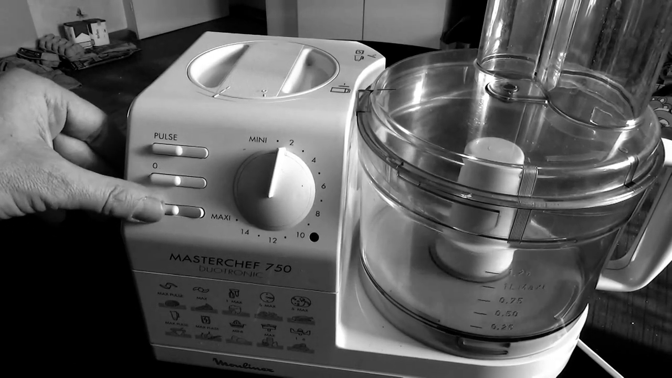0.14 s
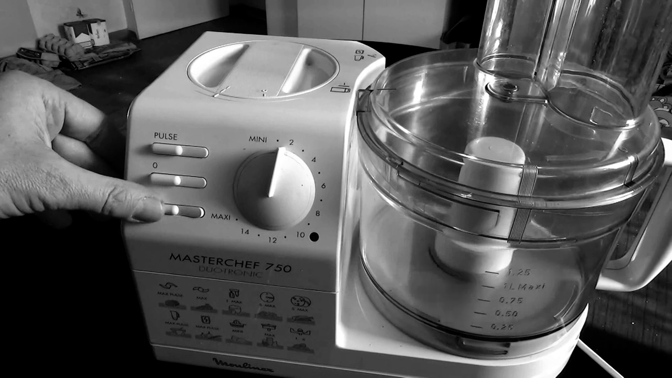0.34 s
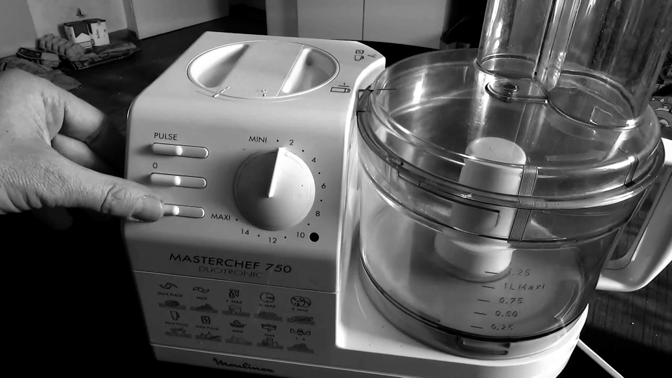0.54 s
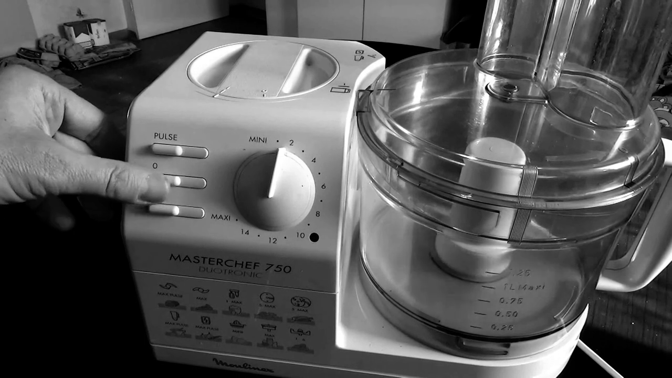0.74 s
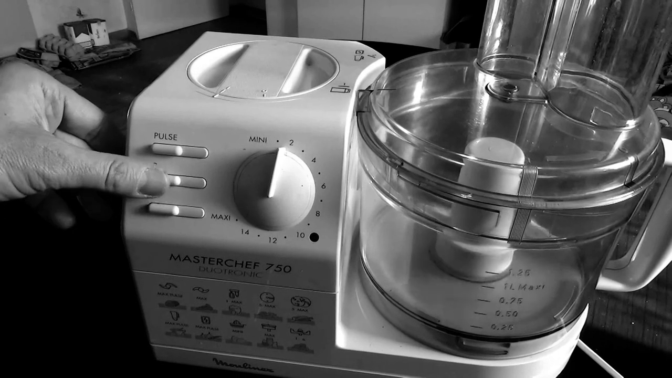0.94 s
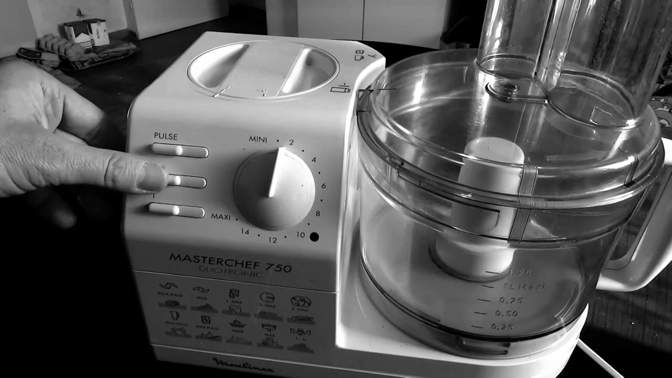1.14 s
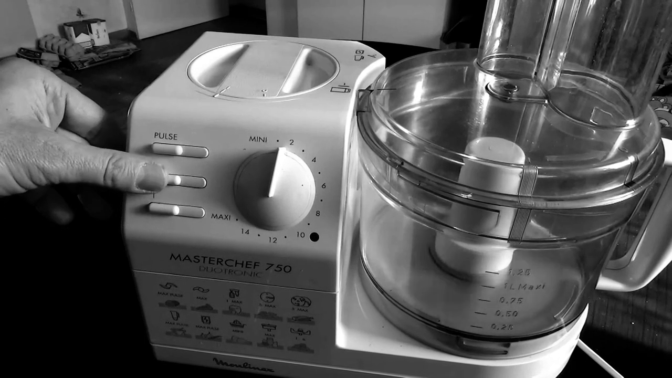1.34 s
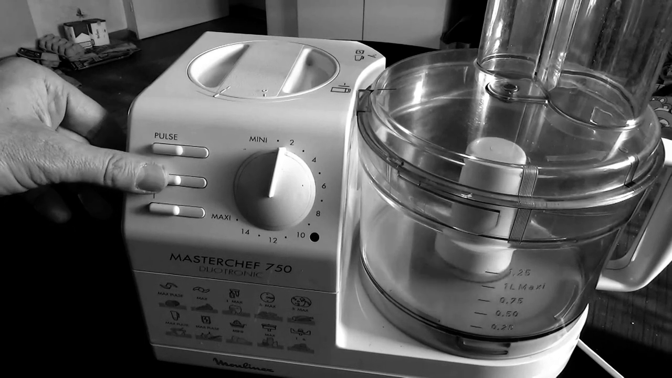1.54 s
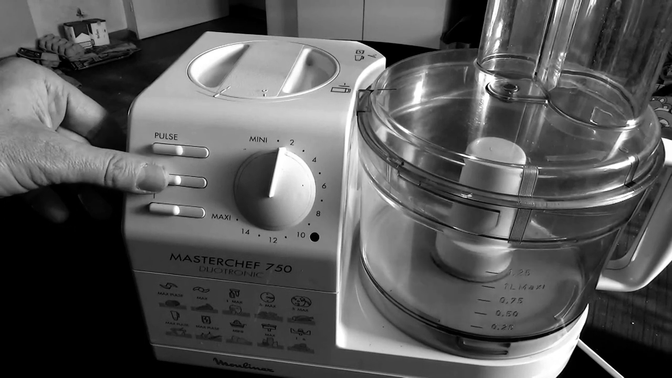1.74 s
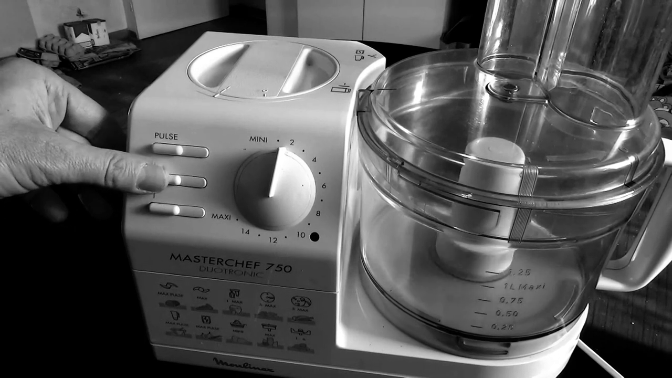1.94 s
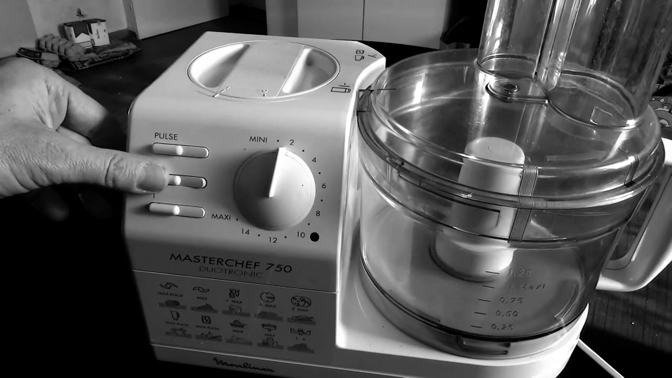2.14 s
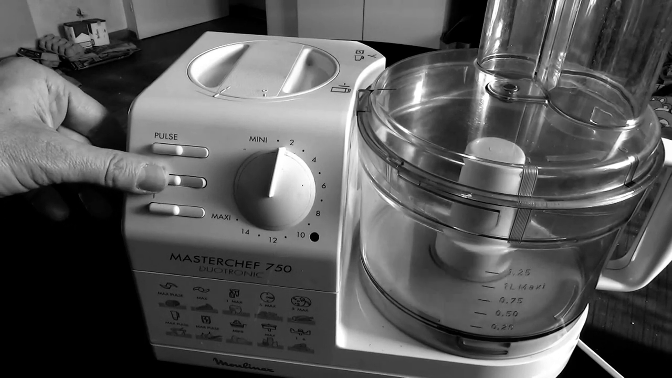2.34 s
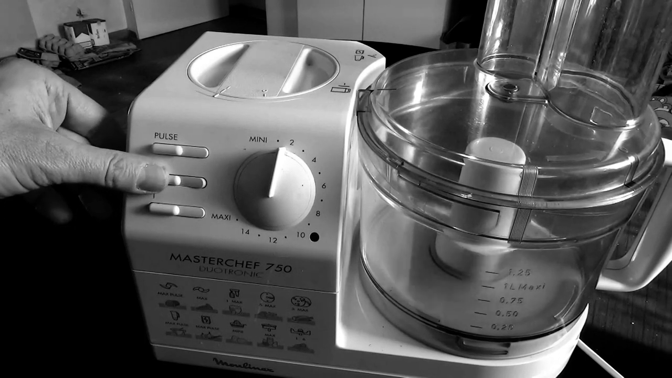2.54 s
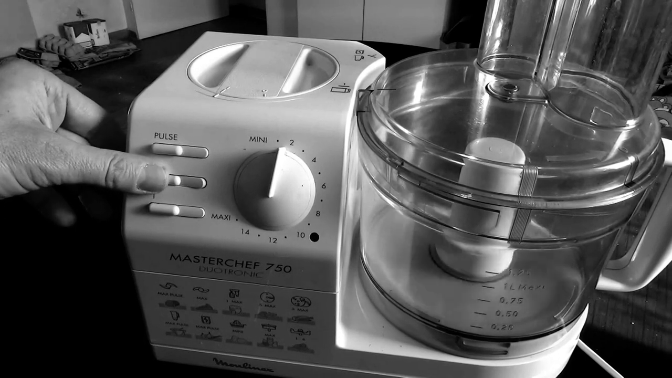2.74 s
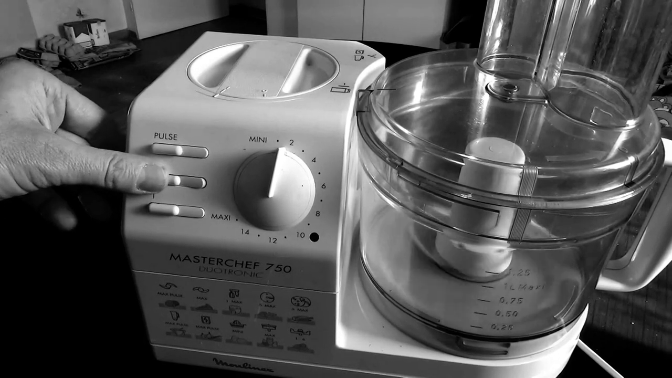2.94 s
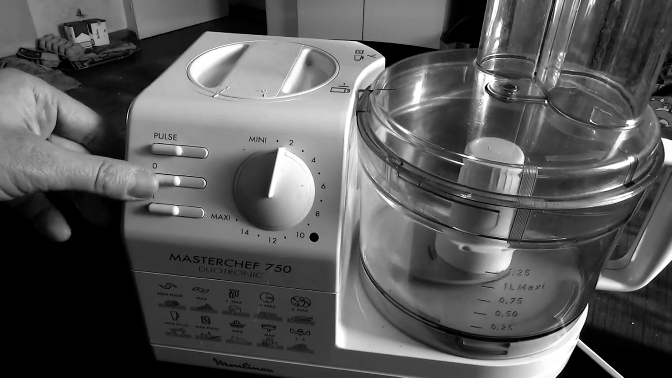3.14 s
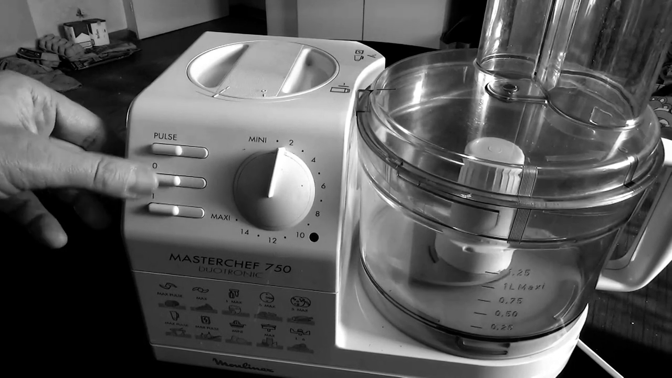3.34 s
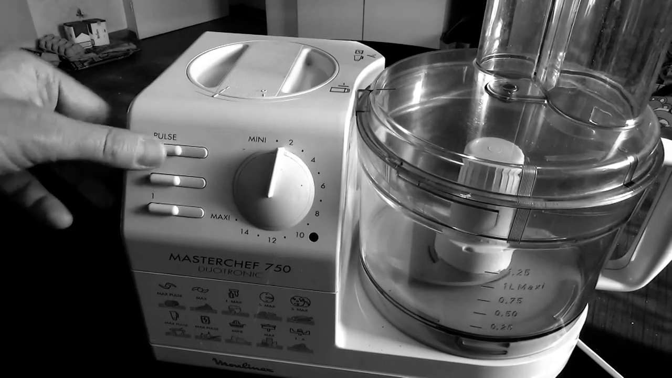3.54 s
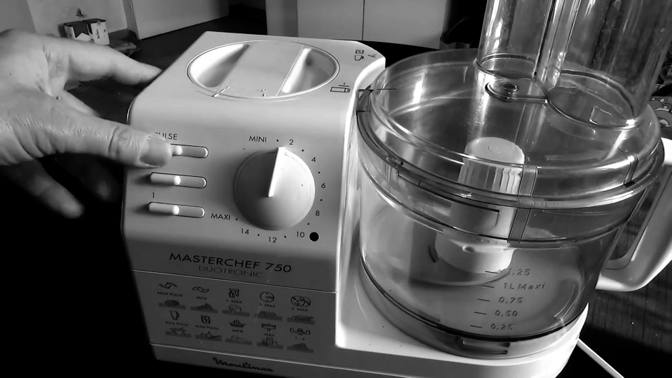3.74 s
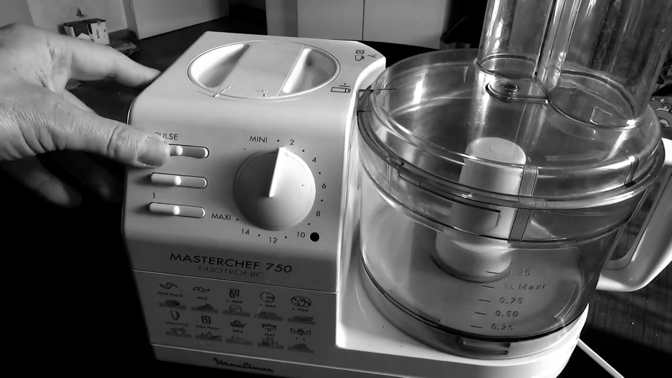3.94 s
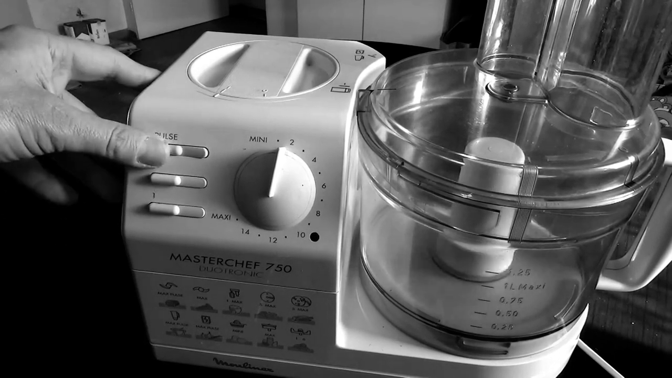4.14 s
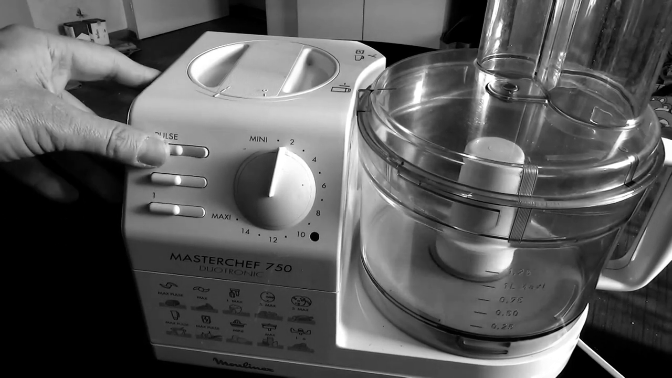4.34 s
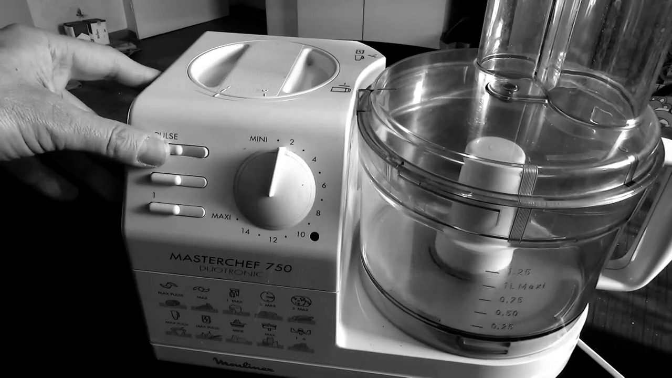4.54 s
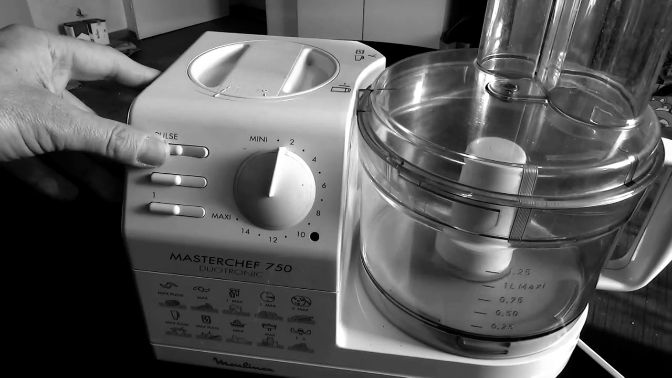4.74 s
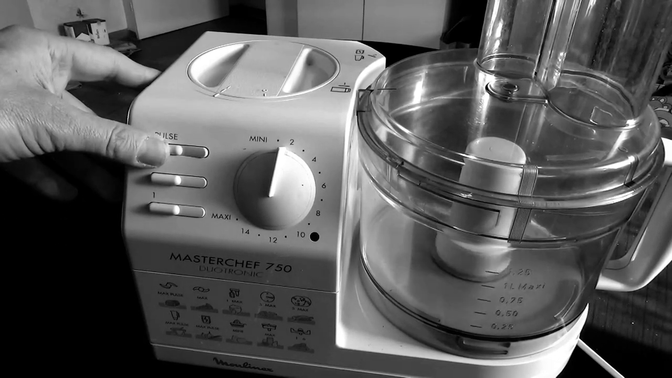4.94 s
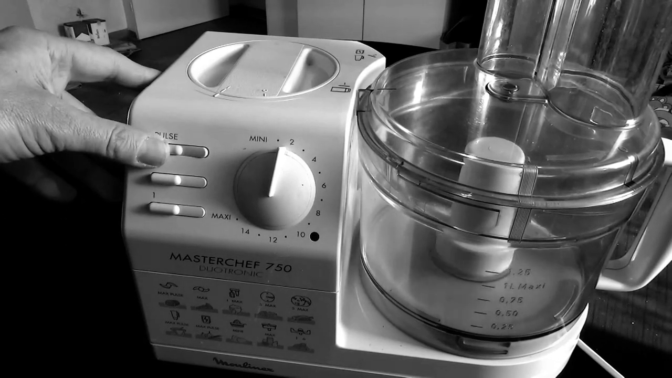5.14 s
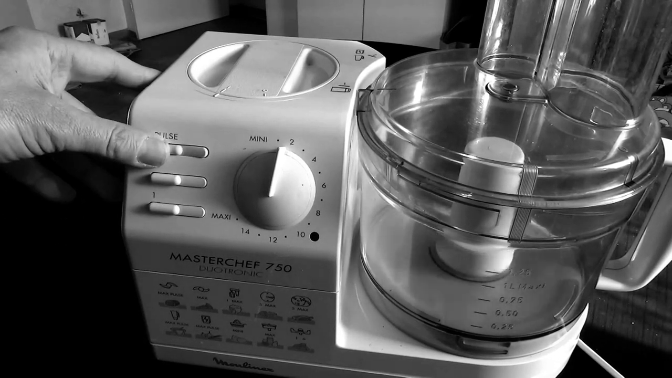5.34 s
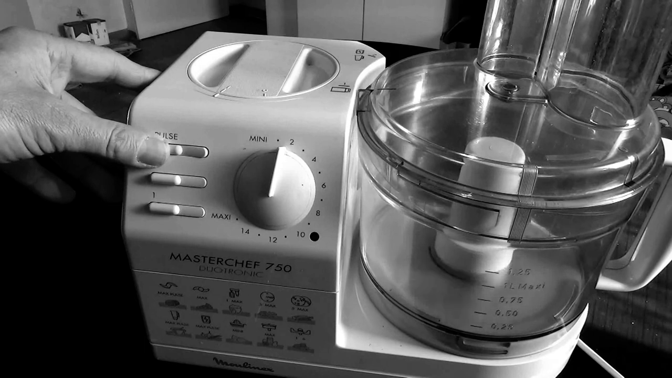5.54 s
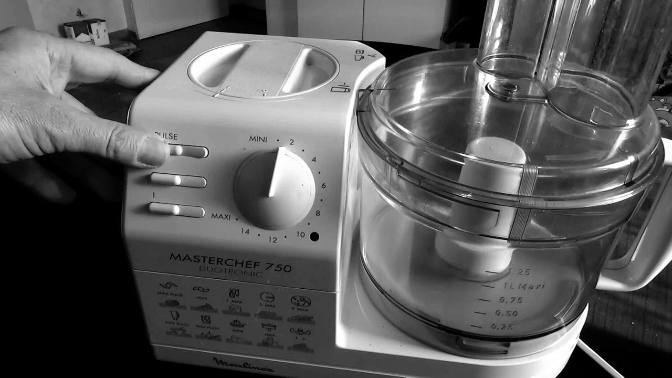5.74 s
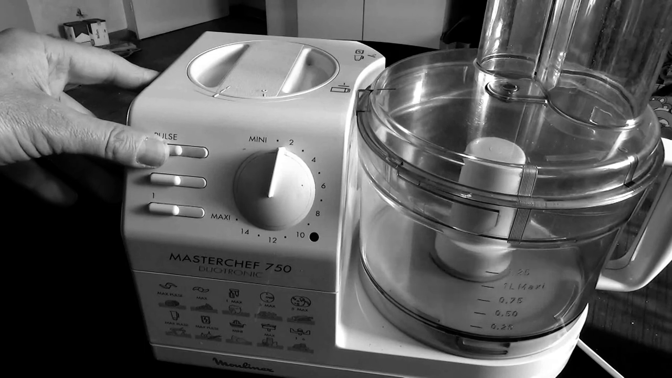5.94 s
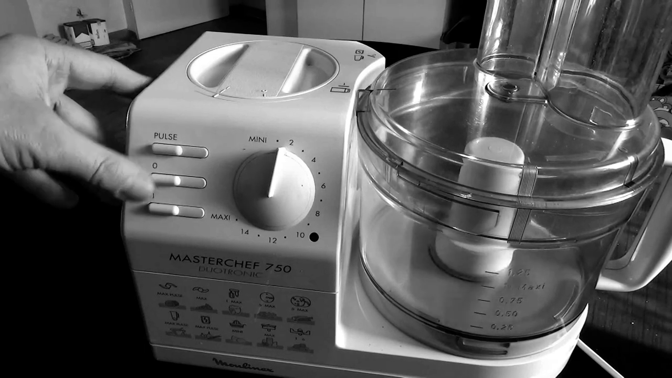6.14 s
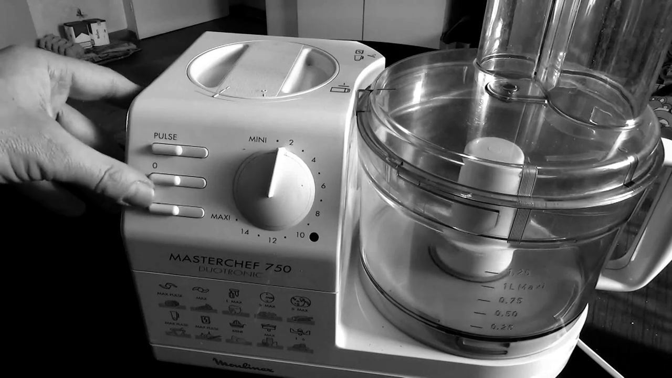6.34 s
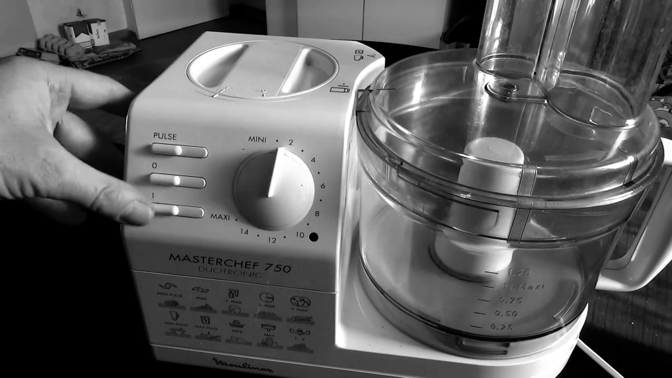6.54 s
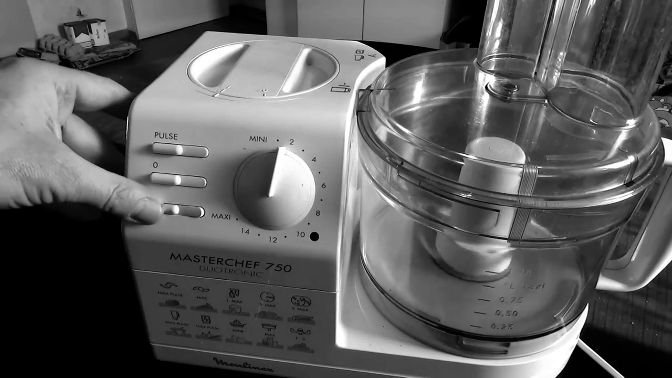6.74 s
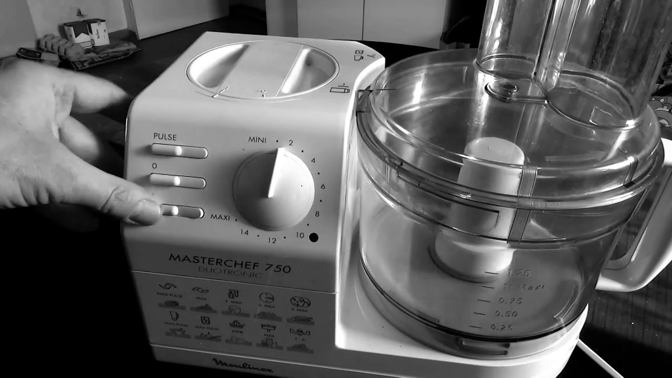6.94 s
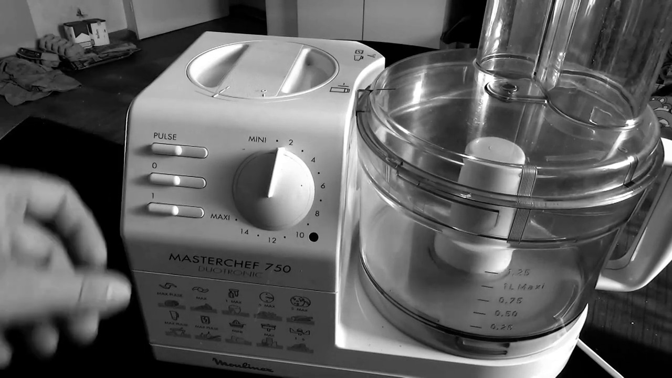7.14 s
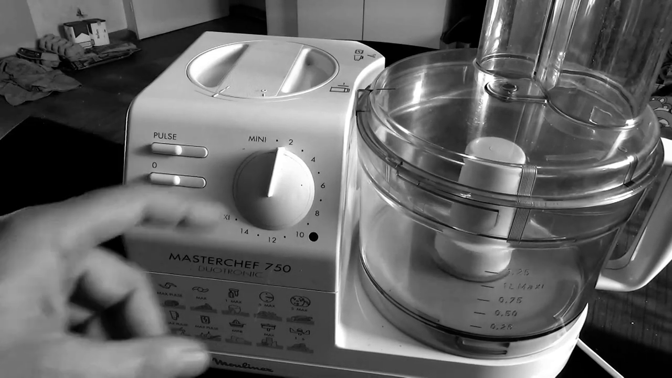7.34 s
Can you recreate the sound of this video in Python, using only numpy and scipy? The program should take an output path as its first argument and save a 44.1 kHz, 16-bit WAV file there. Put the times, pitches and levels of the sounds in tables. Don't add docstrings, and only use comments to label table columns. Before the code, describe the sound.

A small electric kitchen machine runs empty, miked closely, with slight indoor reflections. Harsh mains-rate hum, rumble, gritty rattle and hiss surround a toothed-belt whine. Twice the power drops out: the hum vanishes and clearer whirring tones slide down in pitch and loudness. Light button taps and skin scuffs are heard in the first coast. Each restart comes with bright clicks and a brief jolt, then swells to full running.

```python
import sys
import numpy as np
from scipy import signal
from scipy.fft import rfft, irfft, next_fast_len
from scipy.io import wavfile
from scipy.ndimage import uniform_filter1d

SR = 44100
rng = np.random.default_rng(int(sys.argv[2]) if len(sys.argv) > 2 else 0)


def transcribe(signal):
    frames = np.atleast_2d(signal).T
    limited = np.clip(frames, -1, 1)
    pcm = np.round(limited * 32767).astype(np.int16)
    wavfile.write(sys.argv[1], SR, pcm)


def voltage_ratio(decibels):
    exponent = np.asarray(decibels, float) / 20
    return 10 ** exponent


N = 326340
TEETH, MAINS_HZ = 19, 50
FULL_HZ = 1372
SPIN_UP_S, DRAG_PER_S = .068, .38
STALL = .09
SETTLE_S = 0.44


def rms_one(x):
    return x / np.sqrt(np.mean(x ** 2) + 1e-20)


def coloured(x, points):
    size = next_fast_len(len(x))
    log_hz = np.log(np.arange(size // 2 + 1) * SR / size + 1)
    point_hz, point_db = np.transpose(points)
    gain = voltage_ratio(np.interp(log_hz, np.log(point_hz), point_db))
    return irfft(rfft(x, size) * gain, size)[:len(x)]


def drift(rate):
    r = np.exp(-40 * np.pi * rate / SR)
    noise = rng.standard_normal(N // 20 + 2002)
    slow = signal.lfilter([1], [1, -2 * r, r * r], noise)[2000:]
    return np.interp(np.arange(N) / 20, np.arange(len(slow)), rms_one(slow))


def ring(clicks, hz, t60):
    r, w = voltage_ratio(-60 / (t60 * SR)), 2 * np.pi * hz / SR
    return signal.lfilter([0, np.sin(w)], [1, -2 * r * np.cos(w), r * r], clicks + 1e-18)


def resonate(x, modes):
    for hz, width_hz, db in modes:
        w, g = 2 * np.pi * hz / SR, voltage_ratio(db / 2)
        a = np.sin(w) * width_hz / hz / 2
        top = [1 + a * g, -2 * np.cos(w), 1 - a * g]
        bottom = [1 + a / g, -2 * np.cos(w), 1 - a / g]
        x = signal.lfilter(top, bottom, x)
    return x


# (f/Hz, width/Hz,
# level/dB)
HOUSING = [(160.7, 11.5, 11.5), (221, 21, 6.5), (281.8, 61, 9.5), (323, 45, -16), (342, 41, 10.5),
           (741, 96, -3), (1042, 390, 6.5), (1175, 97, 3.5), (1570, 120, 3.5), (2100, 280, 1.5),
           (2393, 120, 5), (2580, 110, -3), (3710, 35, 7), (4640, 37, 6.5), (6680, 160, 7.5),
           (8940, 270, 3), (4100, 190, 5), (5880, 880, 4),
           (11830, 250, 8), (12400, 150, 4), (12750, 300, -4), (13320, 300, 9), (13760, 480, 12),
         (14400, 500, -3), (15200, 700, 4)]


def housing(x):
    return resonate(x, HOUSING)


# (f/Hz, width/Hz, level/dB)
BOWL = [(800, 250, 2), (980, 110, 7), (1180, 160, -6), (1680, 110, 8), (2060, 100, 7), (2380, 220, -6),
        (2640, 120, 10), (3350, 200, 3), (4100, 350, -7), (5150, 500, -5)]


def bowl(x):
    return resonate(x, BOWL)


def partials(phase, orders, levels_db, wobble_db, slur, rate):
    total = 0
    for k, db in zip(orders, levels_db):
        height = np.sqrt(2) * voltage_ratio(db + wobble_db * drift(rate))
        total = total + height * np.sin(k * phase + slur * drift(rate) + 2 * np.pi * rng.random())
    return total


# (from t/s, to t/s, friction/Hz per s)
POWER = [
    (-.15, 2.135, 865),
    (3.961, 6.02, 900),
    (6.882, 9, 900),
]


def power():
    t = np.arange(N) / SR
    flowing = sum((t > start) & (t < stop) for start, stop, _ in POWER)
    return uniform_filter1d(flowing * 1., size=300)


def since_start():
    t, starts = np.arange(N) / SR, np.array(POWER)[:, 0]
    return t - starts[np.searchsorted(starts, t) - 1]


def speed():
    t, hz = np.arange(N) / SR, np.zeros(N)
    left = 0
    next_starts = [row[0] for row in POWER[1:]] + [np.inf]
    for (start, stop, friction), next_start in zip(POWER, next_starts):
        def coast(s):
            pull = friction / DRAG_PER_S
            return np.maximum((FULL_HZ + pull) * np.exp(-DRAG_PER_S * (s - stop)) - pull, 0)
        spin_up = FULL_HZ - (FULL_HZ - left) * np.exp(-np.abs(t - start) / SPIN_UP_S)
        hz = np.where(t < start, hz, np.where(t < stop, spin_up, coast(t)))
        left = coast(next_start)
    return hz


def level(on, running_db, missing_db, coasting_db, exponent):
    pace = np.maximum(speed() / FULL_HZ - STALL, 0) / (1 - STALL)
    running = voltage_ratio(running_db - missing_db * np.exp(-since_start() / SETTLE_S))
    return on * running + (1 - on) * voltage_ratio(coasting_db) * pace ** exponent


def surge(db, rise_s, hold_s, fall_db):
    t = since_start()
    return np.minimum(t / rise_s, 1) * voltage_ratio(db - fall_db * np.maximum(t - hold_s, 0))


UNBALANCE = [-59, -42, -50.5, -41.5]
# (level/dB, rise t/s, hold t/s, fall/dB per s)
SHAKE_SURGE = (10, 0.09, 0.11, 68)
ROTOR_ORDERS = [15, 16, 17, 18, 21, 19, 38, 57, 76]
ROTOR = [-47, -48, -38.5, -43, -47, -40, -47.5, -44.5, -45]
TOOTH = [-45, -38, -38, -38.5, -49]
# (running level/dB, missing after a start/dB, coasting level/dB, power of speed)
TONE_RULES = [
    (-5, 4, 1, .3),
    (-3, 5, 3, 1.05),
    (-2, 9, -5, 1.5),
]


def tones(on):
    tooth_hz = speed()
    tooth = 2 * np.pi * np.cumsum(tooth_hz) / SR
    turn = tooth / TEETH
    low, upper, high = [level(on, *rule) for rule in TONE_RULES]
    shake = partials(turn, range(1, 5), UNBALANCE, wobble_db=5.0, slur=1.0, rate=8.0)
    shake = shake * (tooth_hz / FULL_HZ) ** 1.03
    blur = .3 + 1.1 * on
    rotor = partials(turn, ROTOR_ORDERS[:5], ROTOR[:5], wobble_db=2.0, slur=blur, rate=22.)
    above = partials(turn, ROTOR_ORDERS[5:], ROTOR[5:], wobble_db=2.0, slur=blur, rate=22.)
    whine = partials(tooth, range(5, 10), TOOTH, wobble_db=3.5, slur=1.45, rate=45.)
    whine = whine * (1 + .35 * np.cos(2 * turn))
    shaking = np.hypot(low, surge(*SHAKE_SURGE)) * shake
    return shaking + low * rotor + upper * above + high * whine


# (mains harmonic, rotor order, level/dB)
HUM = [(1, 0, -62), (2, 0, -40), (3, 0, -38), (5, 0, -24.5), (6, 0, -23.5), (8, 0, -42), (9, 0, -38),
       (10, 0, -38), (1, 1, -47), (4, 1, -30), (6, 1, -33), (9, 1, -39), (10, 1, -39), (5, -1, -44),
       (-2, 6, -42), (5, 6, -39), (6, 6, -40)]


def hum(on):
    turn = 2 * np.pi * np.cumsum(speed()) / SR / TEETH
    mains = 2 * np.pi * MAINS_HZ * np.arange(N) / SR
    lines = 0
    for m, r, db in HUM:
        lines = lines + partials(m * mains + r * turn, [1], [db], wobble_db=3.0, slur=0.25, rate=10.0)
    swell = voltage_ratio(-2.5 * np.exp(-since_start() / SETTLE_S))
    return on * swell * lines


# (t/s, level change/dB)
LURCHES = [(.01, 10.5), (.27, 4), (.45, -6), (.85, 11), (1.65, 5), (2.07, 7.5), (3.07, 7), (4.095, 7),
           (4.22, 7), (4.51, -2), (4.99, 2), (5.2, 7), (5.69, 6), (5.94, 9), (6.01, -4), (6.63, 8),
           (6.99, 1.5), (7.17, 3), (7.24, 0), (7.325, -1)]


def lurches():
    t = np.arange(N) / SR
    return sum(db * np.exp(-((t - s) / 0.015) ** 2) for s, db in LURCHES)


# (f/Hz, level/dB per Hz)
NOISE = [(18, -78), (30, -46), (88, -27), (174, -16.5), (215, 0.5), (287, -4.5), (404, -12.5), (666, -12.5),
         (801, -18), (1190, -22.5), (1810, -23.5), (4420, -31), (6720, -29), (10800, -31.5), (16000, -44)]
# (running level/dB, missing just after a start/dB, random patches/dB)
RUNNING = [
    (-17, 5, 1),
    (-18.5, 10.5, 1.0),
    (-28.5, 8, 0.86),
    (-23.5, 10, 0.38),
]
# (level/dB, rise t/s, hold t/s, fall/dB per s)
SURGE = [
    (-10, 0.043, 0.1, 120),
    (-13, 0.0043, 0.055, 64),
    (-19.5, .003, 0.011, 84),
    (-26.5, .003, 0.061, 77),
]
# (level/dB at full speed, power of speed)
COASTING = [
    (-19.5, 0.81),
    (-22, 1.05),
    (-32, 0.53),
    (-26, 0.94),
]


def drive_noise(on):
    cycles = MAINS_HZ * np.arange(N) / SR
    jolt = np.exp(.35 * rng.standard_normal(int(cycles[-1]) + 3))
    edges_hz = (20, 400, 2200, 5000, 18000)
    throbs = [(.8, 1.0, 0.82), (.55, 0.85, 0.27), (.55, 0.8, .15), (0.46, 0.36, 0.077)]
    out = 0
    for k, (lag, depth, lurch) in enumerate(throbs):
        late = cycles - lag + 1
        throb = 1 + on * depth * jolt[late.astype(int)] * np.exp(-(late % 1) / 0.34)
        grit = rng.standard_normal(N) * voltage_ratio(2.27 * np.minimum(rng.exponential(1, N), 5))
        sos = signal.butter(3, edges_hz[k:k + 2], "band", fs=SR, output="sos")
        band = rms_one(housing(signal.sosfilt(sos, coloured(grit * throb, NOISE))))
        running_db, missing_db, patchy_db = RUNNING[k]
        gain = np.hypot(level(on, running_db, missing_db, *COASTING[k]), surge(*SURGE[k]))
        out = out + band * gain * voltage_ratio(lurch * lurches() - 1.5 + patchy_db * drift(9.0))
    return out


# (f/Hz, level/dB per Hz)
ROOM_TONE = [(18, -39), (30, -13), (70, -18), (165, 0.5), (245, 1), (273, -1.5), (569, -15.5), (1160, -15),
             (1590, -18), (1910, -21), (4780, -29.5), (6900, -24), (16000, -28)]


def room_tone():
    return voltage_ratio(-53.5) * rms_one(coloured(rng.standard_normal(N), ROOM_TONE))


# (f/Hz, t60/s, level/dB)
FAR_FAN = (1150, .05, -64)


def far_fan():
    hz, t60, db = FAR_FAN
    return voltage_ratio(db) * rms_one(ring(rng.standard_normal(N), hz, t60))


# (t/s, level/dB)
RUB = [(3.24, -47), (3.33, -56), (3.45, -63), (3.62, -78), (3.69, -51.5), (3.78, -49), (3.86, -56),
       (3.96, -43), (3.97, -90)]
# (f/Hz, level/dB per Hz)
FINGER = [(59, -51), (100, -31), (244, 2), (335, -1.5), (1130, -12), (4670, -16.5), (11200, -17),
          (11900, -32), (16000, -31)]


def finger_rub():
    s, db = np.transpose(RUB)
    skin = rms_one(housing(coloured(rng.standard_normal(N), FINGER)))
    return voltage_ratio(np.interp(np.arange(N) / SR, s, db)) * skin


def struck(at_s, level_db, t60s, spectrum):
    t = np.arange(N) / SR
    envelope = np.zeros(N)
    for start, db, t60 in zip(at_s, level_db, t60s):
        part = slice(int(start * SR), int((start + .25) * SR))
        envelope[part] += voltage_ratio(db - 60 * (t[part] - start) / np.clip(t60, .008, .2))
    return envelope * rms_one(coloured(rng.standard_normal(N), spectrum))


# (t/s, peak level/dB, t60/s)
SNAPS = [(2.1384, 1.5, 0.023), (3.9499, -12, 0.013), (3.9666, 0, 0.015), (4.053, -8, 0.05),
         (6.8648, 0.5, 0.03), (6.8857, -16, 0.03), (6.913, -9, 0.033), (6.9526, -22, 0.033),
         (7.0304, -14, 0.03)]
# (f/Hz, level/dB per Hz)
SWITCH = [(1180, -40), (2000, -22), (3870, -15.5), (4530, -20), (5250, -13), (6360, -5.5), (7250, -10),
          (9250, -12.5), (10300, -19), (12900, -15), (16000, -26)]


def switch_snaps():
    s, db, t60 = np.transpose(SNAPS)
    return struck(s, db - 7.5, t60, SWITCH)


# (t/s, tick level/dB, knock level/dB, thud level/dB, t60/s)
TAPS = [(3.259, -17.5, -20.5, -65, 0.049), (3.5977, -56, -58, -50, 0.06), (3.6743, -47, -56, -65, 0.06),
        (3.712, -27, -29, -61, 0.092), (3.7271, -49, -25, -49, 0.04), (3.7445, -44, -46, -55, 0.052),
        (3.8138, -40, -45, -66, 0.045), (3.8475, -32, -19, -52, 0.038), (3.8476, -43, -30, -41, 0.045),
        (3.8964, -39, -28, -35, 0.066), (3.9048, -29, -27, -52, 0.066), (3.919, -34, -36, -38, 0.058),
        (3.9356, -34, -20, -41, 0.023)]
# (f/Hz, level/dB per Hz)
TICK = [(1470, -8), (2200, 1), (3300, -2), (4500, -21), (6100, 1), (8000, -20), (14000, -40)]
# (f/Hz, level/dB per Hz)
KNOCK = [(260, -44), (480, -10), (800, 9.5), (1000, 3.5), (1400, -2), (2000, -3.5), (2600, -18),
         (3400, -31)]


def button_taps():
    s, tick_db, knock_db, thud_db, t60 = np.transpose(TAPS)
    ticks = struck(s, tick_db - 5, t60 * 0.43, TICK)
    knocks = struck(s, knock_db - 8.5, t60, KNOCK)
    pushes = np.zeros(N)
    pushes[((s + .006) * SR).astype(int)] = voltage_ratio(thud_db)
    return ticks + knocks + ring(pushes, 244, 0.17) + ring(pushes, 256, 0.14)


def kitchen(x):
    t = np.arange(int(.4 * SR)) / SR
    dull = signal.lfilter([1], [1, -.75], rng.standard_normal(len(t)))
    tail = dull * voltage_ratio(-60 * t / 0.2) * (t > .003)
    return signal.fftconvolve(x, tail / np.sqrt(np.sum(tail ** 2)))[:N]


# (f/Hz, side minus mid level/dB)
WIDTH = [(40, -11), (80, -20), (160, -26), (350, -21), (700, -18.5), (1400, -20), (2800, -19),
         (5200, -24.5), (8500, -16.5), (11500, -20), (12800, -32), (16000, -36)]
# (f/Hz, left minus right level/dB)
LEAN = [(60, -2.0), (110, -1.5), (200, 0.0), (380, 0.5), (700, 0.5), (1290, 0.0), (2380, -1.5), (4400, 0.0),
        (8120, 0.0), (15000, 0.0)]


def two_ports(mid):
    shifted = np.imag(signal.hilbert(mid, next_fast_len(N)))[:N]
    side = coloured(1.35 * shifted + 0.13 * kitchen(mid), WIDTH)
    left = coloured(mid + side, [(hz, db / 2) for hz, db in LEAN])
    right = coloured(mid - side, [(hz, -db / 2) for hz, db in LEAN])
    return np.array([left, right])


def scene():
    on = power()
    close = bowl(housing(tones(on))) + finger_rub() + switch_snaps() + button_taps()
    mid = close + voltage_ratio(-10.5) * kitchen(close) + hum(on) + drive_noise(on)
    return two_ports(mid + room_tone() + far_fan())


def top_cut(x):
    return signal.sosfilt(signal.butter(12, 16510, fs=SR, output="sos"), x)


def record(dry):
    x = signal.sosfilt(signal.butter(3, 65, "high", fs=SR, output="sos"), dry)
    x = 1.15 * np.tanh(x / 1.15)
    x = signal.sosfilt(signal.ellip(10, .5, 55, 15700, fs=SR, output="sos"), x)
    return top_cut(x)


dry = scene()
out = record(dry)
transcribe(out)
```